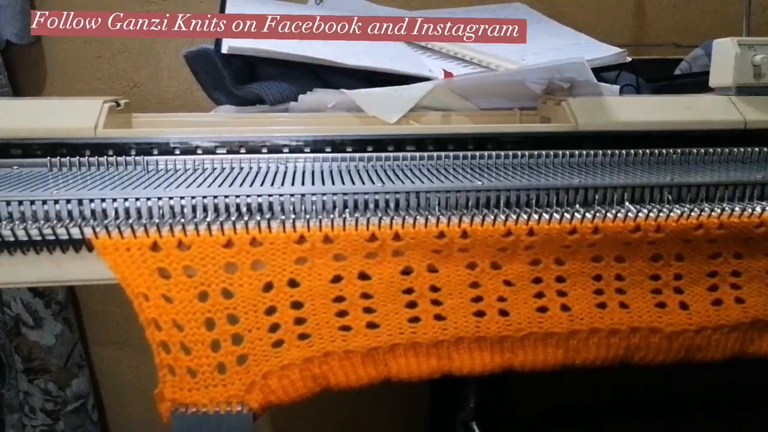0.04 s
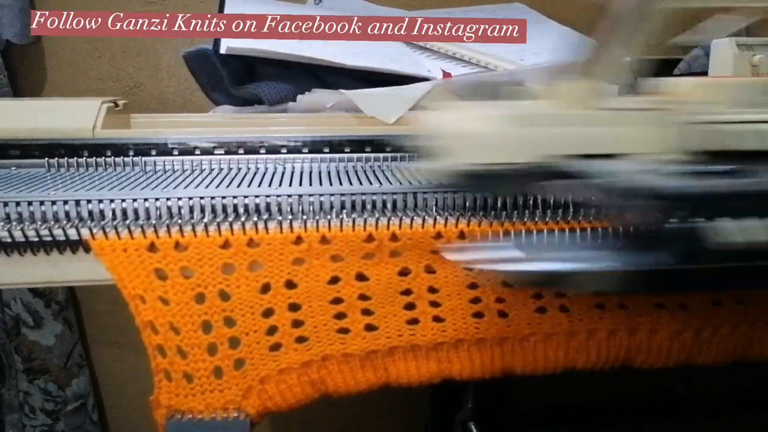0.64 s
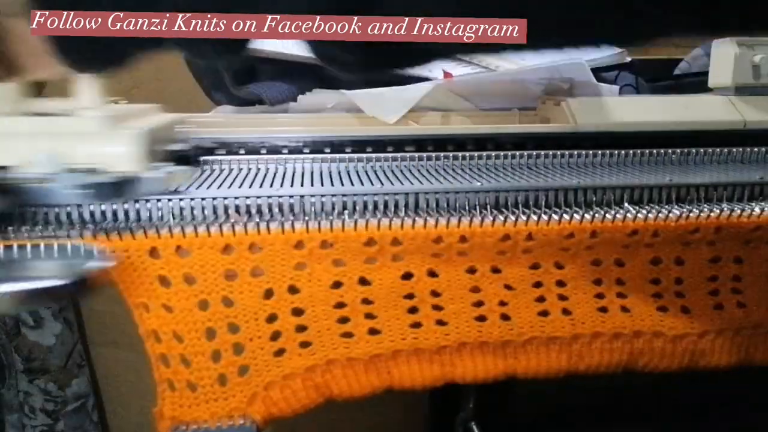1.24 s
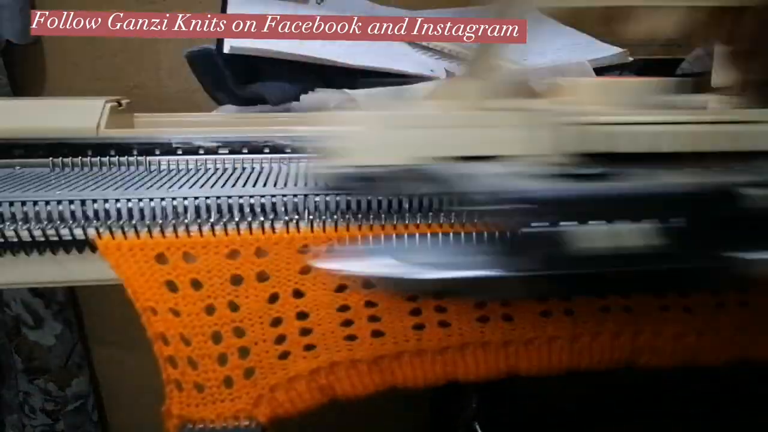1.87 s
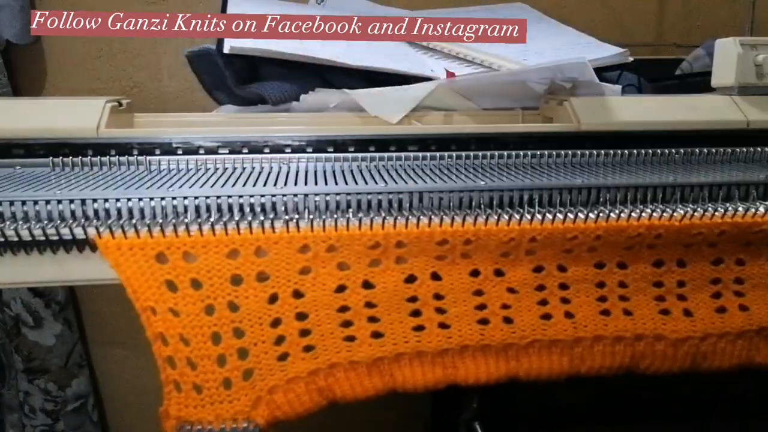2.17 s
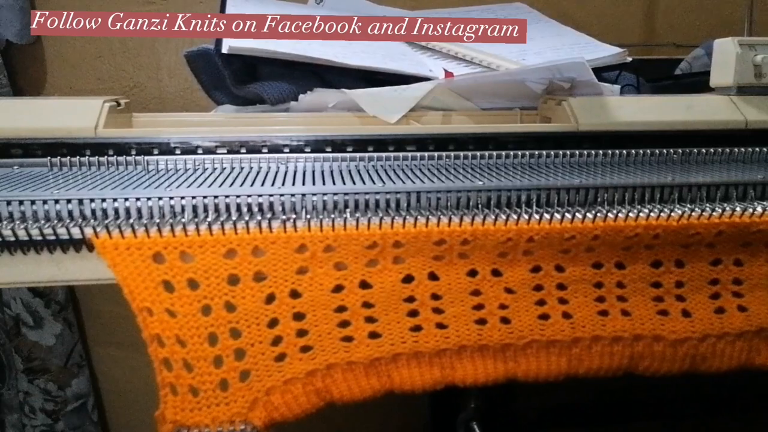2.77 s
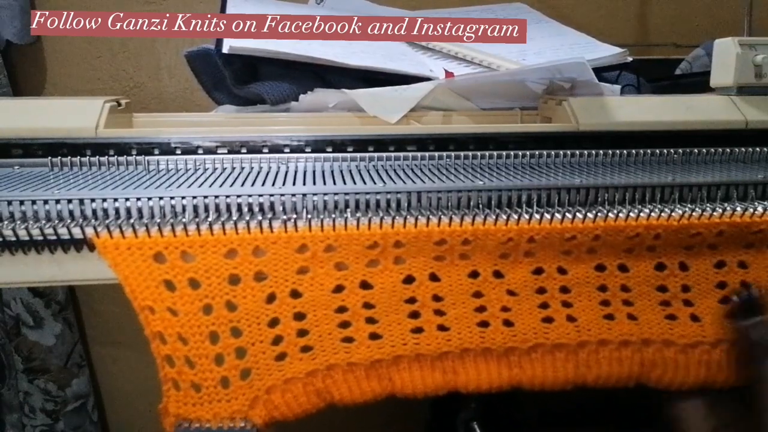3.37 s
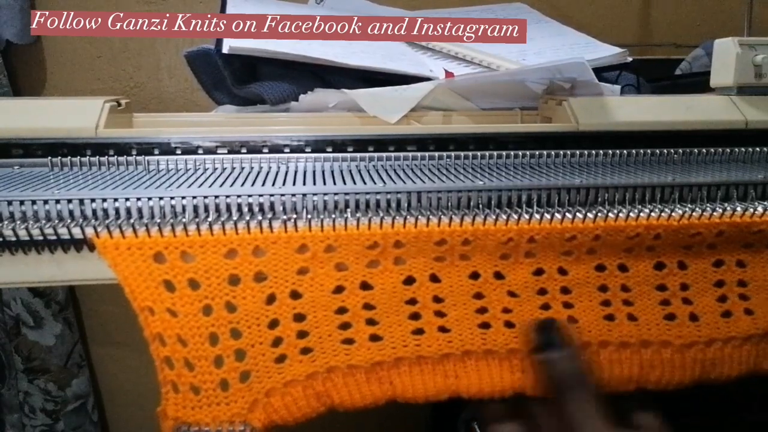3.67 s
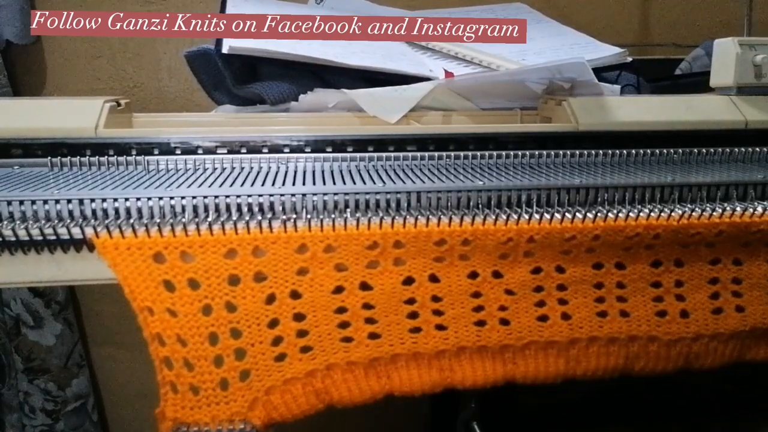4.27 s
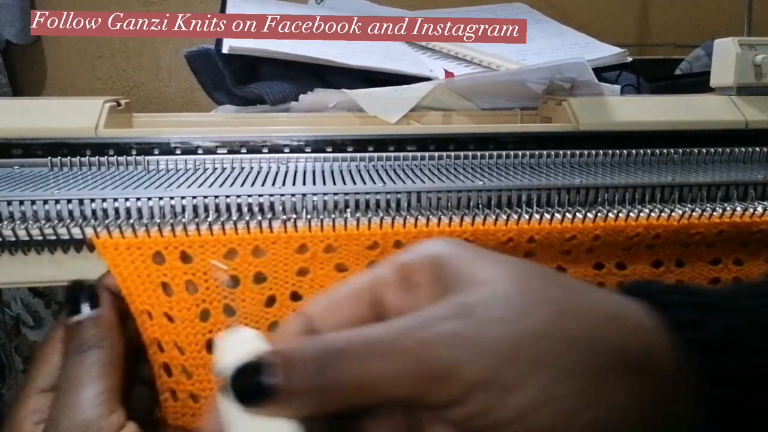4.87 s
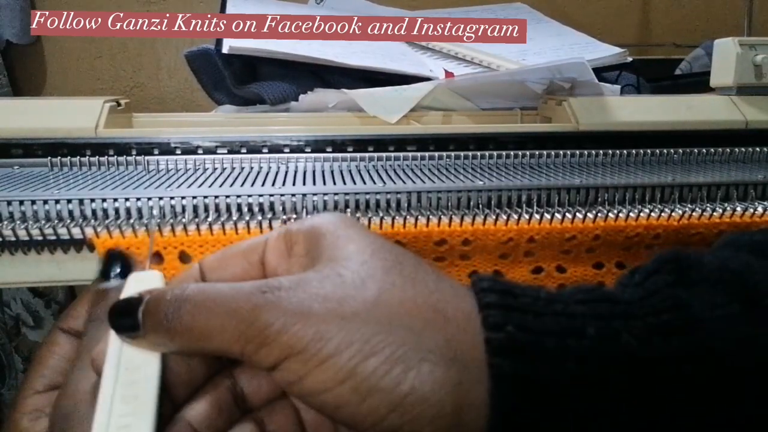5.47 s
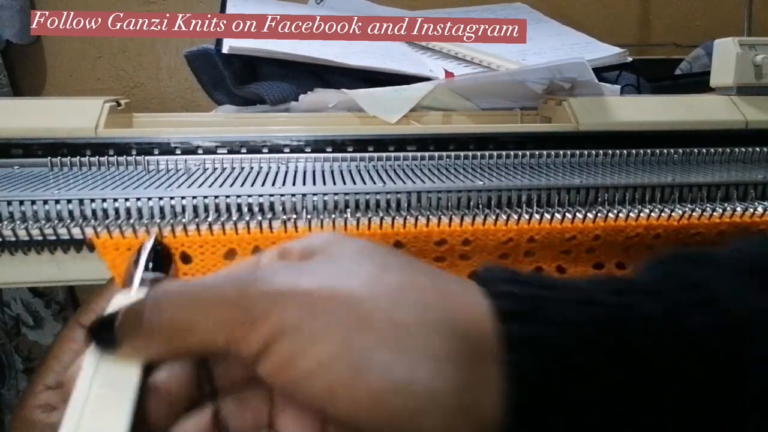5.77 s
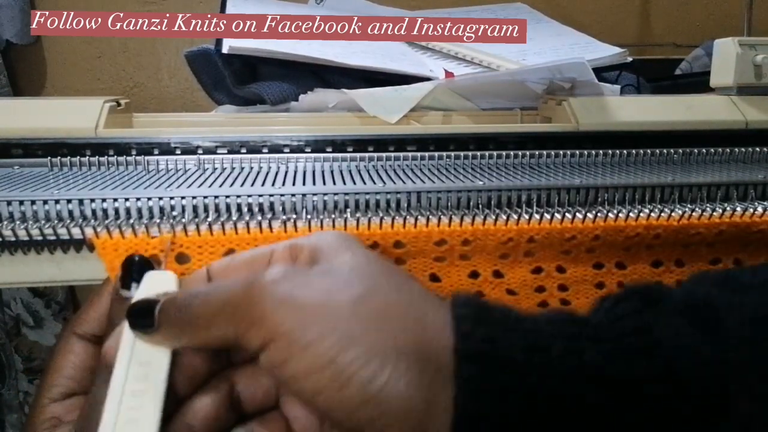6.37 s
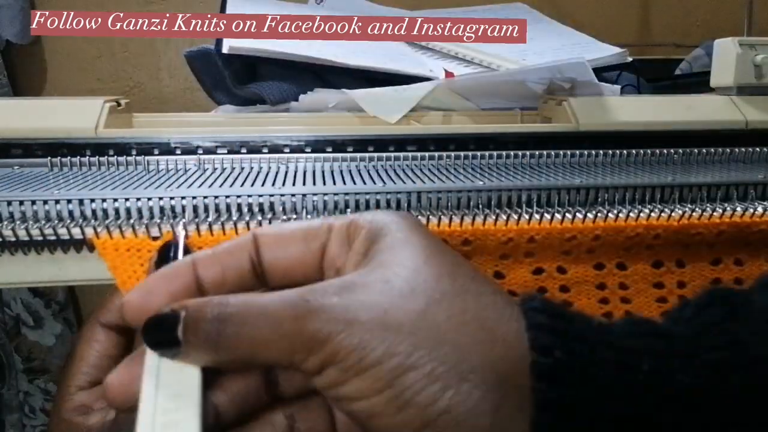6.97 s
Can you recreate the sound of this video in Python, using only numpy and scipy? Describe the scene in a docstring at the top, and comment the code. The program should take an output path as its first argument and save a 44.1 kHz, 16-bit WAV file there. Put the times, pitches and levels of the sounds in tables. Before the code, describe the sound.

Close up in a small room with steady hiss, a knitting machine's carriage slides over the needles twice, each pass a dense metallic rattle with a hum from the case. Sharp clicks and a brief jingle separate the passes, and the steel rings faintly afterwards. Then it is much quieter: a soft rustle of wool, followed by scattered light ticks and tiny scrapes of a hand tool on the needles.

```python
"""Over the hiss of a small room, a knitting machine's carriage is pushed left along the steel needle bed:
cams slide on needle butts, needles and latches rattle, and the case hums at the needle rate.
Parts catch and a loose plate jingles at the turn; the carriage is pushed back and the steel rings on.
The knitting rustles as it is pulled down, then a hand tool ticks and scrapes on single needles."""
import sys
import numpy as np
from scipy import signal
from scipy.fft import rfft, irfft, next_fast_len
from scipy.io import wavfile
from scipy.ndimage import uniform_filter1d, map_coordinates

SR = 44100
rng = np.random.default_rng(int(sys.argv[2]) if len(sys.argv) > 2 else 0)


def to_wav(s):
    """Save 16-bit WAV."""
    ch = np.atleast_2d(s).T  # columns
    pcm = np.round(np.clip(ch, -1, 1) * 32767)  # PCM
    wavfile.write(sys.argv[1], SR, pcm.astype(np.int16))


N = 309141
TIME_S = np.arange(N) / SR


def amp(db):
    """Decibels to gain."""
    return 10 ** (np.asarray(db) / 20)


def unit(x):
    """Scale to rms 1."""
    return x / np.sqrt(np.mean(x ** 2) + 1e-20)


def panned(db):
    """Stereo gains for a pan, left minus right in dB."""
    return amp(np.outer([.5, -.5], db))


def along(points, hz):
    """(Hz, value) points read on a log axis."""
    point_hz, values = np.transpose(points)
    return np.interp(np.log(hz + 1), np.log(point_hz + 1), values)


def ramp(start_s, length_s):
    """Linear rise from 0 to 1, at least 1 ms long."""
    return np.clip((TIME_S - start_s) / max(length_s, .001), 0, 1)


def since(start_s):
    """Seconds since the start, 0 before it."""
    return np.maximum(TIME_S - start_s, 0)


def wobble(rate_hz):
    """Smooth random curve through rate_hz knots a second."""
    knots = rng.standard_normal(int(N * rate_hz / SR) + 4)
    fine = np.arange(0, len(knots) - 1, 1 / 8)
    return np.interp(TIME_S * rate_hz, fine, map_coordinates(knots, [fine]))


def noise(size):
    """Stereo white noise."""
    return rng.standard_normal((2, size))


def add(track, start_s, sound):
    """Mix a sound into the track."""
    part = track[:, max(round(start_s * SR), 0):][:, :sound.shape[1]]
    part += sound[:, :part.shape[1]]


# Stereo width. Each row: frequency in Hz, left-right correlation.
CORRELATION = [(60, 0.06), (150, 0.66), (380, 0.74), (950, 0.09), (2380, 0)]
# Stereo balance. Each row: frequency in Hz, pan in dB.
BALANCE = [(180, -2.5), (400, -6.5), (1200, -1.5), (3000, -0.5), (6200, 2.5), (7100, 9), (8200, 2),
           (9500, -3), (14000, 0.5)]


def coloured(pair, spectrum, peaks=()):
    """Give a pair a spectrum (Hz, dB), peaks (Hz, width Hz, dB) and the stereo image, at rms 1."""
    n = pair.shape[1]
    size = next_fast_len(n + 2048)
    hz = np.fft.rfftfreq(size, 1 / SR)
    blend_rad = np.arcsin(np.clip(along(CORRELATION, hz), -1, 1)) / 2
    peaks_db = sum(db / (1 + (2 * (hz - centre) / width) ** 2) for centre, width, db in peaks)
    bins = rfft(pair, size)
    blended = bins * np.cos(blend_rad) + bins[::-1] * np.sin(blend_rad)
    shaped = blended * amp(along(spectrum, hz) + peaks_db) * panned(along(BALANCE, hz))
    return unit(irfft(shaped, size)[:, :n])


def swelling(pair, middle_s, half_s, hz, skirt_db):
    """One band, skirt_db down an octave away, swelling and fading."""
    band = coloured(pair, [(hz / 2, -skirt_db), (hz, 0), (hz * 2, -skirt_db)])
    return band * np.exp(-((TIME_S - middle_s) / half_s) ** 2)


# Room hiss. Each row: frequency in Hz, relative level in dB.
HISS_SPECTRUM = [(40, -5.5), (400, -3.5), (700, -5), (1400, -11.5), (2850, -11.5), (7100, -17),
                 (12000, -25), (15000, -27)]


def room():
    """Hiss and low rumble; the rumble rises as the second pass ends, and both sink near the end."""
    risen, sunk = ramp(2.66, 0.21), ramp(5.55, 0.21)
    hiss = coloured(noise(N), HISS_SPECTRUM, [(2870, 790, 3.5), (3960, 880, -6), (7230, 700, 3)])
    rumble = coloured(noise(N), [(30, -1.5), (85, -3), (220, -31), (900, -80)])
    return amp(-47.5 - 4.5 * sunk) * hiss + amp(-66.5 + 9.5 * risen - 27 * sunk) * rumble


# Scuffs on the rail. Each row: start and hold in seconds, steel and case levels in dB.
RAIL_SCUFFS = [(0, 0.03, -23, -33), (1.15, 0.045, -32, -59), (1.248, 0.016, -42, -60),
               (1.505, 0.038, -32, -60), (1.587, 0.041, -26, -35.5), (2.677, 0.016, -27.5, -75),
               (2.743, 0.023, -33, -54)]
# Passes, left then back. Each row: cams engage, cams leave and carriage stops in seconds, steel level
# in dB, its attack in seconds, case level in dB, its attack in seconds, pan, hum and singing in dB.
CARRIAGE_PASSES = [(0.056, 0.99, 1.21, -12, 0.11, -28, 0.12, -1.1, -3.5, -1.5),
                   (1.568, 2.539, 2.76, -14.5, 0.11, -30, 0.22, -1, -0.5, -7)]
CRUISE_HZ, STOP_FADE_S = 200, 0.078


def push(needle_hz):
    """Steel, case, hum and singing gains: a pass builds, follows the speed and runs out; scuffs add."""
    steel, case, hum, shake = np.zeros((2, N)), np.zeros(N), np.zeros(N), np.zeros(N)
    pace = needle_hz / CRUISE_HZ
    for (start_s, leave_s, stop_s, steel_db, steel_attack_s, case_db, case_attack_s,
         pan_db, hum_db, singing_db) in CARRIAGE_PASSES:
        moving = 1 - ramp(stop_s, STOP_FADE_S)
        # Slow sag as the shove eases, fast fall as the cams run out of the needles.
        steel_level = amp(steel_db - 0.7 * since(start_s) - 77 * since(leave_s))
        case_level = amp(case_db - since(start_s) - 71 * since(leave_s))
        rattle = moving * ramp(start_s, steel_attack_s) * pace ** 1.77 * steel_level
        rumble = moving * ramp(start_s, case_attack_s) ** 1.13 * pace ** 0.18 * case_level
        steel += rattle * panned(pan_db)
        case += rumble
        hum += rumble * amp(hum_db)
        shake += rattle * amp(singing_db)
    for start_s, hold_s, steel_db, case_db in RAIL_SCUFFS:
        scuff = ramp(start_s, 0.001) * amp(-274 * since(start_s + hold_s))
        steel += amp(steel_db) * scuff
        case += amp(case_db) * scuff
        shake += amp(steel_db) * scuff
    return steel, case, hum, shake


def bed_ring(t60_s):
    """Impulse response of one spot of the bed: a direct tick, then evenly spread modes."""
    t = np.arange(SR // 10) / SR
    modes = rfft(noise(len(t)) * amp(-60 * t / t60_s))
    modes /= np.sqrt(uniform_filter1d(np.abs(modes) ** 2, size=90, axis=1))
    return irfft(modes + .5)


def needle_impacts(travel, scatter, spread_db, t60_s, contacts):
    """Butts hit cams and latches flick, ringing the bed; travel and scatter are in needles."""
    needles = np.arange(int(travel[-1]))
    blows = np.zeros((2, N))
    for side in blows:  # each side is near other contacts
        chance = rng.standard_normal((2000, contacts, 2))[:len(needles)]
        position = needles[:, None] + np.arange(contacts) / contacts * .8 + scatter * chance[..., 0]
        onsets = np.searchsorted(travel, position.ravel()).clip(0, N - 1)
        side += np.bincount(onsets, amp(spread_db * chance[..., 1].ravel()), N)
    blows -= blows.mean()
    out, stretch = np.zeros((2, N)), SR // 9
    for i in range(0, N, stretch):  # each stretch of the bed rings differently
        add(out, i / SR, signal.fftconvolve(blows[:, i:i + stretch], bed_ring(t60_s), axes=1))
    return unit(out)


# Lightly damped steel. Each row: frequency in Hz, level in dB, t60 in seconds.
SINGING_MODES = [(4365, -31, 1.8), (11790, -31, 0.7)]


def singing(shake):
    """Steel shaken by the rattle rings on unevenly after the carriage stops."""
    t = np.arange(2 * SR) / SR
    ring = np.zeros(len(t))
    for hz, db, t60_s in SINGING_MODES:
        energy_norm = np.sqrt(2 * np.log(1000) / (t60_s * SR))
        ring += energy_norm * amp(db - 60 * t / t60_s) * np.sin(2 * np.pi * hz * t)
    return signal.fftconvolve(shake * noise(N), ring[None], axes=1)[:, :N] * amp(3 * wobble(35))


# Case hum. Each row: multiple of the needle rate, relative level in dB.
HUM_HARMONICS = [(2, -14), (3, -11.5), (4, -10), (5, -10.5)]


def case_hum(needle_hz, travel):
    """Evenly spaced needles make overtones, strongest at full speed."""
    tones = sum(amp(db + 3.5 * wobble(22)) * np.sin(2 * np.pi * k * travel) for k, db in HUM_HARMONICS)
    return (needle_hz / needle_hz.max()) ** 3 * tones


# Mid-pass swells of the table. Each row: middle and half length in seconds, relative level in dB.
BOOM_SWELLS = [(0.545, 0.11, -8.5), (2.04, 0.165, -14)]
SMOOTH_HZ, STANDSTILL_JUDDER_RAD = 220, 4


def table_boom(needle_hz, travel):
    """The table booms at the needle rate; a slow carriage judders and turns the tone to rumble."""
    floor = amp(-18.5 + 3 * wobble(12)) * needle_hz / CRUISE_HZ
    swells = sum(amp(db) * np.exp(-((TIME_S - middle_s) / half_s) ** 4)
                 for middle_s, half_s, db in BOOM_SWELLS)
    judder_rad = STANDSTILL_JUDDER_RAD * np.maximum(1 - needle_hz / SMOOTH_HZ, 0) * wobble(90)
    return (floor + swells) * amp(2.5 * wobble(35) - 2.5) * np.sin(2 * np.pi * travel + judder_rad)


# Local resonances. Each row: middle and half length in seconds, frequency in Hz, level in dB.
BED_FLARES = [(0.227, 0.11, 605, -36), (0.446, 0.026, 470, -35.5), (0.773, 0.19, 7160, -52),
              (1.716, 0.033, 5340, -27), (2.225, 0.021, 430, -47), (2.71, 0.065, 1930, -45)]


def flares(rattle):
    """Resonances of bed and case flare as the carriage crosses them."""
    return sum(amp(db) * swelling(rattle, middle_s, half_s, hz, skirt_db=57)
               for middle_s, half_s, hz, db in BED_FLARES)


# Carriage speed, one list per pass. Each row: time in seconds, needles per second.
PASS_SPEEDS = [
    [(0.1, 184), (0.222, 201), (0.264, 191), (0.336, 216), (0.44, 204), (0.858, 203), (0.94, 186),
     (1.0, 168), (1.22, 124)],
    [(1.6, 170), (1.7, 204), (1.784, 220), (1.918, 216), (2.054, 224), (2.225, 214), (2.28, 186),
     (2.45, 168), (2.68, 122)],
]
# Spectra of steel and case. Each row: frequency in Hz, relative level in dB.
STEEL_SPECTRUM = [(820, -35.5), (1400, -14), (1980, -9.5), (2950, -7.5), (3490, -6.5), (3810, -13),
                  (4610, -8), (5040, -2.5), (6330, -4.5), (7060, -2), (9990, -6), (15000, -9)]
CASE_SPECTRUM = [(130, -24), (200, -17.5), (450, -14.5), (630, -6), (850, -4.5), (1150, 2), (1420, -9.5),
                 (2100, -16.5)]
# Resonances of bed and carriage. Each row: frequency and width in Hz, boost in dB.
BED_PEAKS = [(481, 35, 8), (629, 24, 8.5), (1110, 33, -3.5), (1995, 78, 2.5), (2910, 280, 3.5),
             (5350, 190, 0), (7200, 790, 2), (9920, 170, 4.5)]


def carriage():
    """Needle impacts and sliding friction sound the steel bed, the case and the table."""
    left_hz, back_hz = (np.interp(TIME_S, *np.transpose(rows)) for rows in PASS_SPEEDS)
    return_s = CARRIAGE_PASSES[1][0]
    needle_hz = np.where(TIME_S < return_s, left_hz, back_hz)
    steel_gain, case_gain, hum_gain, shake = push(needle_hz)
    travel = np.cumsum(needle_hz * (1 + .012 * wobble(45))) / SR
    drag_db = 0.5 * wobble(70)  # stiff and loose needles
    rattle = needle_impacts(travel, scatter=.12, spread_db=3.2, t60_s=.04, contacts=4) + .2 * noise(N)
    rumble = needle_impacts(travel, scatter=.2, spread_db=3.1, t60_s=.09, contacts=2) + .4 * noise(N)
    steel = steel_gain * amp(drag_db - 1.5) * coloured(rattle, STEEL_SPECTRUM, BED_PEAKS)
    case = case_gain * amp(drag_db - 1) * coloured(rumble, CASE_SPECTRUM, BED_PEAKS)
    tones = hum_gain * case_hum(needle_hz, travel) + case_gain * table_boom(needle_hz, travel)
    return steel + case + flares(rattle) + tones * panned(-7) + singing(shake)


# Knock under a click. Each row: frequency in Hz, relative level in dB.
KNOCK_SPECTRUM = [(300, -41), (1050, 5.5), (1400, -3.5), (1750, -3.5), (2300, -1), (3100, 5), (4500, -17)]
RING_BOOST_DB = 9


def clicks(rows, spectrum, peaks, width_ratio, rise_s, knock_gain_db, knock_t60_s, tail_db, tail_t60_s):
    """Steel on steel: a bright crack with one favoured resonance and a weak tail, over a duller knock."""
    out, t = np.zeros((2, N)), np.arange(SR // 5) / SR
    attack = 1 - np.exp(-(t / rise_s) ** 4)
    for start_s, db, knock_db, hz, t60_s, pan_db in rows:
        crack = coloured(noise(len(t)), spectrum, [(hz, width_ratio * hz, RING_BOOST_DB), *peaks])
        crack *= amp(-60 * t / t60_s) + amp(tail_db - 60 * t / tail_t60_s)
        knock = coloured(noise(len(t)), KNOCK_SPECTRUM)
        knock *= amp(knock_db + knock_gain_db - 60 * t / knock_t60_s)
        add(out, start_s, amp(db) * attack * (crack + knock) * panned(pan_db))
    return out


# Parts catching. Each row: start in seconds, relative click and knock levels in dB, ring in Hz,
# t60 in seconds, pan in dB.
CATCH_CLICKS = [(0.081, -17, -38, 7660, 0.052, -1), (1.1504, 1, -35.5, 9870, 0.017, 0.5),
                (1.2085, -16.5, -28, 6400, 0.031, 9), (1.2868, -15, -28.5, 7260, 0.021, -1),
                (1.4178, -13.5, -37, 7500, 0.012, 6), (1.4367, -25.5, -19.5, 6500, 0.026, 7),
                (1.495, -14.5, -40, 7300, 0.023, 4.5), (1.5708, -15.5, -22.5, 6200, 0.028, 7),
                (1.6425, -1, -28, 7100, 0.024, 2), (1.7106, 6.5, -31.5, 5300, 0.0086, -1),
                (2.6639, -10, -46, 10500, 0.034, 2), (2.7465, -16.5, -23, 6940, 0.03, 4)]


def catches():
    """Metal parts catch at the ends of the carriage's travel."""
    peaks = [(1790, 270, 10.7), (3500, 52, 4.5)]
    return amp(-4.5) * clicks(CATCH_CLICKS, STEEL_SPECTRUM, peaks, width_ratio=0.085, rise_s=0.0016,
                              knock_gain_db=5.5, knock_t60_s=0.25, tail_db=-27, tail_t60_s=0.43)


def struck_modes(blows):
    """Each blow rings one decaying sine."""
    out = np.zeros((2, N))
    for start_s, hz, db, t60_s in blows:
        t = np.arange(int(t60_s * SR)) / SR
        phase = rng.uniform(0, np.pi / 2, (2, 1))  # the mode is heard from two sides
        envelope = amp(db - 60 * t / t60_s) * np.minimum(t / .002, 1)
        add(out, start_s, envelope * np.sin(2 * np.pi * hz * t + phase))
    return out


# Blows on the steel. Each row: start in seconds, frequency in Hz, level in dB, t60 in seconds.
END_STRIKES = [(1.21, 4365, -52, 1.7), (1.21, 11790, -48, 0.7), (2.764, 4365, -40, 0.17),
               (2.855, 4365, -55.5, 1.6)]


def end_strikes():
    """The end of a pass strikes the singing steel, which flutters as it fades."""
    return struck_modes(END_STRIKES) * amp(3 * wobble(40))


# Blows on the plate. Each row: start in seconds, level in dB.
PLATE_BLOWS = [(1.419, -30), (1.437, -40)]
# Plate modes. Each row: frequency in Hz, relative level in dB, t60 in seconds.
PLATE_MODES = [(3370, -7, 0.16), (4850, -10, 0.06), (7400, -8, 0.08), (7580, 5, 0.035)]


def loose_plate():
    """A loose plate jingles as the carriage reverses."""
    return struck_modes([(start_s, hz, db + mode_db, t60_s)
                         for start_s, db in PLATE_BLOWS for hz, mode_db, t60_s in PLATE_MODES])


# Pulls on the knitting. Each row: middle and half length in seconds, level in dB, centre in Hz.
WOOL_PULLS = [(3.402, 0.064, -53.5, 2750), (3.557, 0.093, -55.5, 7750)]


def wool_rustles():
    """Wool fibres slip under the fingers in soft, grainy strokes."""
    fibres = noise(N) * amp(6 * rng.standard_normal(N))
    return sum(amp(db) * swelling(fibres, middle_s, half_s, hz, skirt_db=34)
               for middle_s, half_s, db, hz in WOOL_PULLS)


# One needle. Each row: frequency in Hz, relative level in dB.
NEEDLE_SPECTRUM = [(2000, -22), (3200, -4), (4000, -11), (5500, 2), (9000, -1), (15000, -3)]
# Taps. Each row: start in seconds, relative click and knock levels in dB, ring in Hz, pan in dB.
TOOL_TAPS = [(3.862, -27.5, -32, 5430, -9), (5.5275, -20.5, -26, 8000, -4), (5.6264, -23, -19, 6160, -2),
             (5.849, -10.5, -24, 5770, -1), (5.9195, -26.5, -17, 7230, 2), (5.9486, -19.5, -43, 12000, -1),
             (6.062, -24, -15.5, 13100, 3), (6.114, -41, 1.5, 6560, -2), (6.1817, -26, -9.5, 5520, -1),
             (6.2476, -31, -18, 6880, -3), (6.7896, -24, -41, 13500, 3), (6.8076, -14.5, -45, 13900, 3)]
TAP_T60_S = 0.0068


def tool_taps():
    """The tool taps single needles, whose ring dies at once."""
    rows = [(start_s, db, knock_db, hz, TAP_T60_S, pan_db)
            for start_s, db, knock_db, hz, pan_db in TOOL_TAPS]
    return amp(-0.5) * clicks(rows, NEEDLE_SPECTRUM, peaks=[], width_ratio=0.39, rise_s=0.0011,
                              knock_gain_db=-4.5, knock_t60_s=0.063, tail_db=-24.5, tail_t60_s=0.069)


# Slides. Each row: middle and half length in seconds, level in dB, ring and width in Hz, boost in dB.
TOOL_SLIDES = [(5.861, 0.018, -44.5, 7000, 700, 3), (5.958, 0.0088, -41, 14100, 4000, 16),
               (6.182, 0.0098, -38, 5530, 520, 17), (6.795, 0.0094, -41.5, 13800, 4000, 15),
               (6.8432, 0.0025, -36.5, 6630, 700, 4)]


def tool_slides():
    """The tool's eye rubs along a needle in a short gritty hiss."""
    out, t = np.zeros((2, N)), np.arange(SR // 5) / SR - .1
    for middle_s, half_s, db, hz, width_hz, boost_db in TOOL_SLIDES:
        grit = noise(len(t)) * amp(2.7 * rng.standard_normal(len(t)))
        envelope = amp(db) * np.exp(-(t / half_s) ** 2 / 2)
        add(out, middle_s + t[0], envelope * coloured(grit, NEEDLE_SPECTRUM, [(hz, width_hz, boost_db)]))
    return out


def scene():
    """Machine, knitting, hand tool and room together."""
    ticks = catches() + tool_taps()
    machine = carriage() + loose_plate() + end_strikes()
    return ticks + machine + wool_rustles() + tool_slides() + room()


def record(dry):
    """Round off the highest peaks, then low-pass steeply at 15.3 kHz."""
    rounded = dry / (1 + np.abs(dry / .92) ** 6) ** (1 / 6)
    size = next_fast_len(N + 8192)
    lowpass = 1 / (1 + (np.fft.rfftfreq(size, 1 / SR) / 15300) ** 200)
    return irfft(rfft(rounded, size) * lowpass, size)[:, :N]


dry = scene()
out = record(dry)
to_wav(out)
```